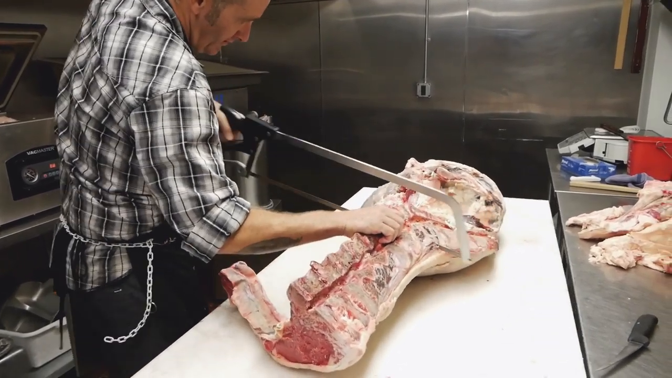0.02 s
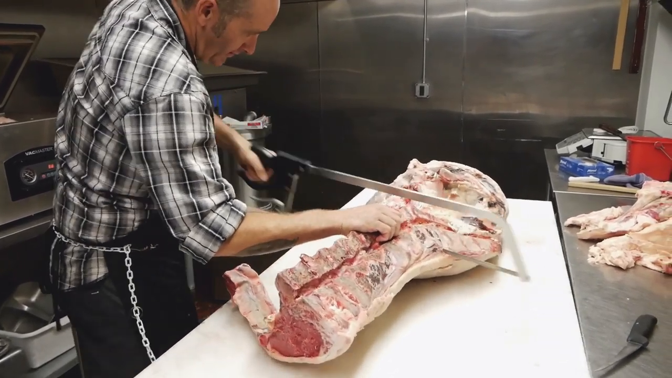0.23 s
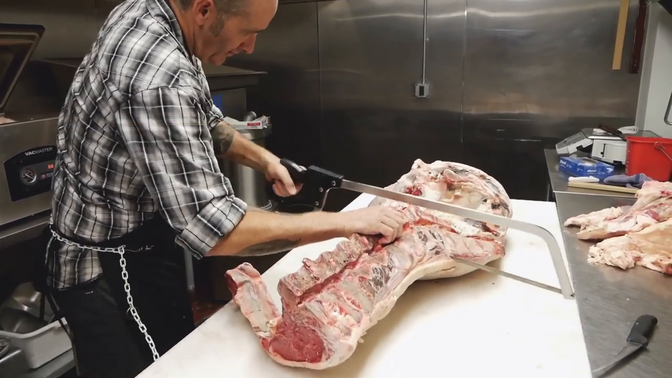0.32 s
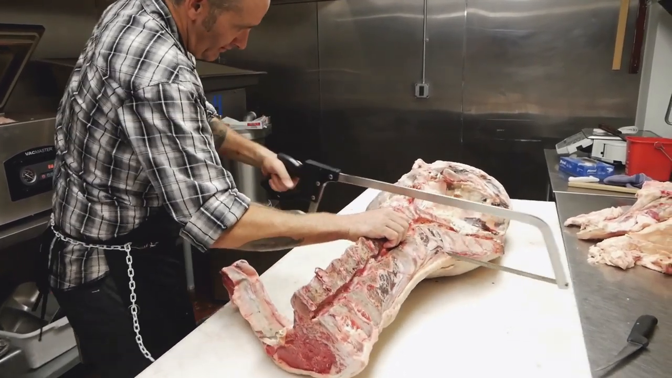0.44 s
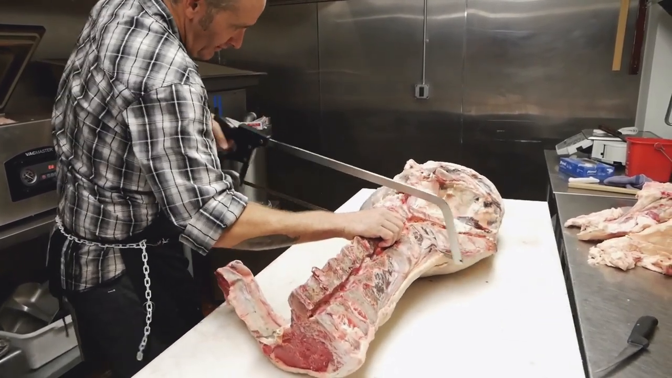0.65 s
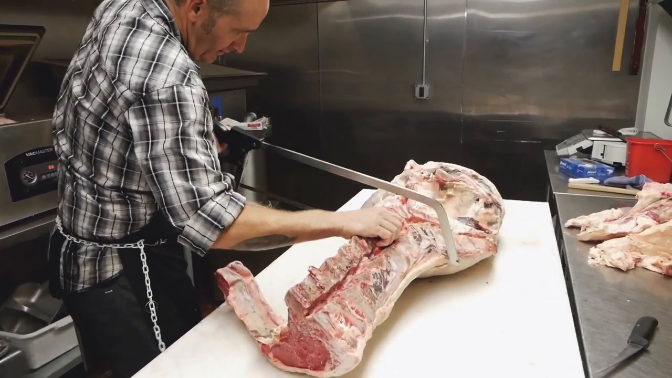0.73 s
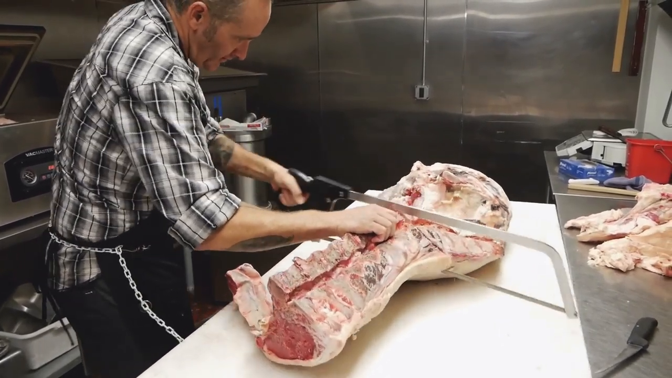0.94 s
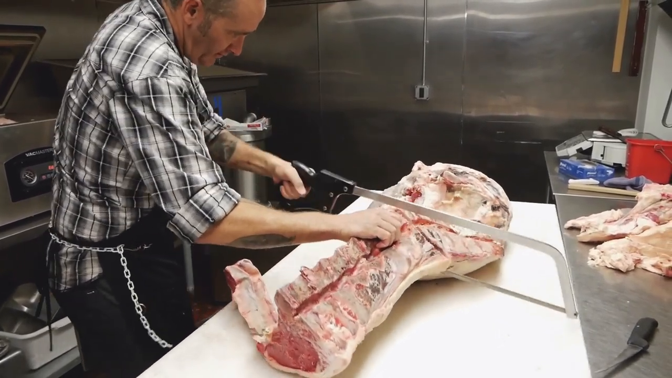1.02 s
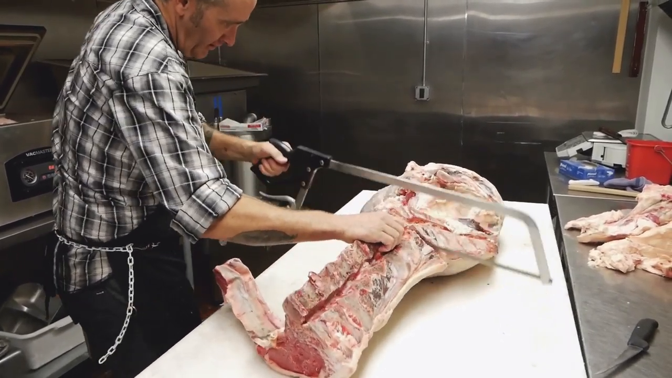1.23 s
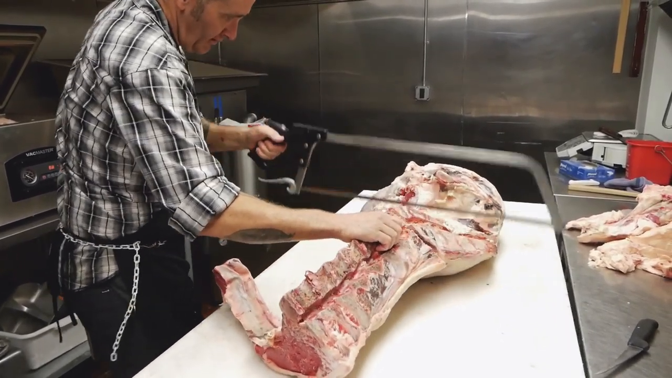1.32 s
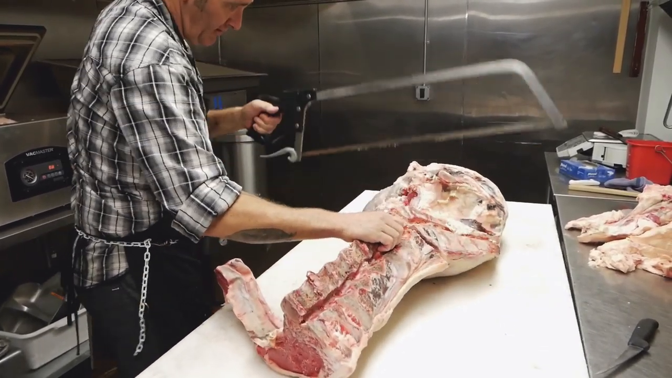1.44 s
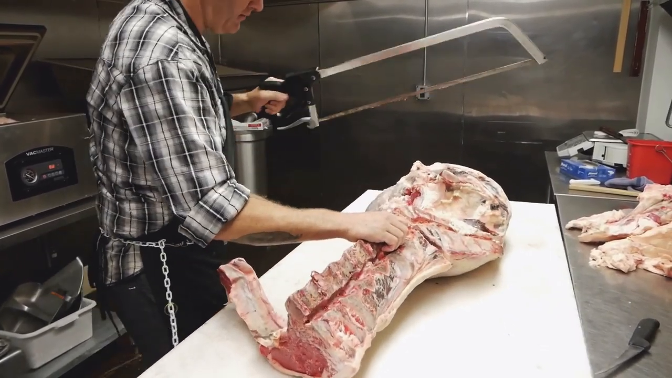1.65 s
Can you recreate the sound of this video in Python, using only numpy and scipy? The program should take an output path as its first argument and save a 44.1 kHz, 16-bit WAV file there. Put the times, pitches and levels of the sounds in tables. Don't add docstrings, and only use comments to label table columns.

```python
import sys
import numpy as np
from scipy import signal
from scipy.fft import rfft, irfft, next_fast_len
from scipy.io import wavfile
from scipy.ndimage import uniform_filter1d, map_coordinates

SR = 44100
rng = np.random.default_rng(int(sys.argv[2]) if len(sys.argv) > 2 else 0)


def pcm_store(signal):
    levels = np.round(np.clip(np.atleast_2d(signal), -1, 1) * 32767)
    wavfile.write(sys.argv[1], SR, levels.astype(np.int16).T)


def ratio_of_db(decibels):
    return 10 ** (np.asarray(decibels, float) / 20)


N = 74970

# f/Hz, level/dB per Hz
BLADE_COLOUR = [(900, -24.5), (2300, -12), (3280, -15.5), (3520, -7.5), (5000, -5.5), (9000, -9.5),
                (13000, -13), (16000, -29)]


def unit(x):
    return x / np.sqrt(np.mean(x ** 2) + 1e-20)


def along(points, hz):
    f, v = np.transpose(points)
    return np.interp(np.log(hz + 1), np.log(f + 1), v)


def curves(rows):
    s, *cols = np.transpose(rows)
    t = np.arange(N) / SR
    gate = np.clip(np.minimum(t - s[0] + 0.0079, s[-1] - t) / 0.0042, 0, 1)
    return [np.interp(t, s, c) for c in cols] + [gate]


def wobble(rate):
    knots = rng.standard_normal(int(N * rate / SR) + 4)
    return map_coordinates(knots, [np.arange(N) * rate / SR])


def filtered(x, response):
    m = next_fast_len(N + SR // 2)
    return irfft(rfft(x, m) * response(np.fft.rfftfreq(m, 1 / SR)), m)[..., :N]


def modes(table):
    def response(f):
        return sum((-1) ** k * ratio_of_db(db) * 1j * f * width / (hz * hz - f * f + 1j * f * width)
                   for k, (hz, width, db) in enumerate(table))
    return response


def colour(points):
    return lambda f: ratio_of_db(along(points, f)) * (f > points[0][0] / 2)


def patchy(x, depth_db):
    z = signal.stft(x, nperseg=256)[2]
    field = uniform_filter1d(rng.standard_normal(z.shape), size=4, axis=0)
    field = uniform_filter1d(field, size=5, axis=1)
    return signal.istft(z * ratio_of_db(depth_db * unit(field)), nperseg=256)[1][:N]


def swing(hz, t):
    return np.sin(2 * np.pi * hz * t)


def decay(db, t, t60_s):
    return ratio_of_db(db - 60 * t / t60_s)


def drop_in(track, start_s, sound):
    track[round(start_s * SR):][:len(sound)] += sound


def cooler():
    # f/Hz, width/Hz, level/dB
    hum_lines = [(27.8, 9.8, -52), (98, 13, -53.5), (147.3, 16, -47.5), (208.9, 5.6, -45.5),
                 (249.3, 18, -46.5), (292.6, 7.8, -54.5), (411.3, 5.7, -51.5), (465, 14, -66),
                 (675, 60, -59.5)]
    # f/Hz, level/dB per Hz
    air_colour = [(20, -7.5), (232, -3.5), (330, -9.5), (405, -8), (560, -18), (2600, -27), (3600, -35.5),
                  (15600, -44)]
    hum = sum(ratio_of_db(line[2]) * unit(filtered(rng.standard_normal(N), modes([line]))) for line in hum_lines)
    air = unit(filtered(rng.standard_normal(N), colour(air_colour)))
    return ratio_of_db(-46.5) * air + hum


def room(x):
    # f/Hz, t60/s
    tile_decay = [(200, 0.53), (2000, 0.39), (6000, 0.47), (14000, 0.2)]
    out, step = np.zeros(N + SR), SR // 8
    for a in range(0, N, step):
        hz, t, z = signal.stft(rng.standard_normal(SR // 2), SR, nperseg=256)
        fall = ratio_of_db(-60 * t / along(tile_decay, hz)[:, None])
        tail = signal.istft(z * fall, SR, nperseg=256)[1]
        y = signal.fftconvolve(x[a:a + step], tail / np.linalg.norm(tail))
        out[a + 200:][:len(y)] += y
    return out[:N]


def shoe():
    # f/Hz, level/dB per Hz
    sole_colour = [(600, -6), (920, -1), (1300, -16), (1650, -19), (4500, -18.5), (7000, -20),
                   (11000, -31.5), (12500, -44)]
    # t/s, length/s, f/Hz, level/dB
    squeaks = [
        (1.61, 0.025, 4240, -51),
        (1.647, .02, 4200, -74),
    ]
    t = np.arange(N) / SR
    u = t - 1.5175
    shape = np.clip(u / 0.003, 0, 1) * decay(0, np.maximum(u - 0.049, 0), t60_s=0.35)
    rub = unit(filtered(rng.standard_normal(N) * ratio_of_db(0.9 * wobble(230)), colour(sole_colour)))
    hiss = filtered(rub, lambda f: np.clip(f / 1500 - 1, 0, 1))
    hiss_gain = decay(2, np.maximum(u - 0.033, 0), t60_s=0.5)
    scuff = ratio_of_db(-42) * shape * (rub + hiss * (hiss_gain - 1))
    for start_s, length_s, hz, db in squeaks:
        swell = np.sin(np.pi * np.clip((t - start_s) / length_s, 0, 1))
        scuff = scuff + ratio_of_db(db) * swell * swing(hz, t)
    return scuff


def handle_knock():
    # f/Hz, level/dB, t60/s
    wood_modes = [(1100, -4, 0.03), (1800, 4.5, 0.018), (2400, 6.5, 0.0076), (3300, 4, 0.0066)]
    out, t = np.zeros(N + SR), np.arange(SR // 8) / SR
    ring = sum(decay(db, t, t60_s) * (1 - np.exp(-t * hz / 0.7)) * swing(hz, t)
               for hz, db, t60_s in wood_modes)
    rest_hz, sag_hz, sag_s = 876, 993, 0.0028
    turns = rest_hz * t + sag_hz * sag_s * (1 - np.exp(-t / sag_s))
    ring += decay(3, np.maximum(t - 0.0041, 0), t60_s=0.031) * np.sin(2 * np.pi * turns)
    drop_in(out, 1.0241, ratio_of_db(-26) * ring)
    return out[:N]


def tooth_ticks():
    # t/s, peak/dB, ring f/Hz, ring t60/s,
    # crack/dB over the peak, crack t60/s
    catches = [(0.19, -23.5, 4680, 0.0046, 4.5, 0.0076), (.4389, -4, 2400, 0.0041, 0, 0.0049),
               (.4435, -14.5, 3300, 0.0032, -2, 0.0026), (.6374, -23.5, 3540, 0.018, -3.5, .01),
               (.641, -28, 3990, 0.0066, 0, .008), (.7135, -33.5, 12100, 0.022, 0, .02),
               (.7155, -35.5, 10030, 0.028, -9, .02), (.8472, -14.5, 4000, 0.018, 0, .01),
               (0.7136, -31, 6100, .025, 4.5, .03), (0.7728, -31, 3770, 0.018, 3, 0.0086),
               (.798, -26, 4960, 0.032, 1.5, 0.012), (.843, -19, 3800, 0.009, 1, 0.023),
               (.8679, -8, 3690, 0.017, -9, .005), (1.0238, -17.5, 4698, 0.004, -2, .004),
               (1.24, -44, 5180, 0.021, -3, .09)]
    # f/Hz, width/Hz, level/dB
    crack_modes = [(5540, 8000, 1)]
    rings, cracks, t = np.zeros(N + SR), np.zeros(N + SR), np.arange(SR // 8) / SR
    for start_s, db, hz, t60_s, crack_db, crack_t60_s in catches:
        rise = 1 - np.exp(-t * hz / 0.66)
        drop_in(rings, start_s, 0.85 * decay(db, t, t60_s) * rise * swing(hz, t))
        crack_rise = 1 - np.exp(-t / crack_t60_s * 12)
        grit = np.sign(rng.standard_normal(len(t)))
        drop_in(cracks, start_s, decay(db + crack_db, t, crack_t60_s) * crack_rise * grit)
    return rings[:N] + filtered(cracks[:N], lambda f: modes(crack_modes)(f) ** 2)


def jolt_rings():
    # t/s, peak/dB, f/Hz, t60/s
    jolts = [(.228, -19, 551, 0.053), (.258, -4.5, 3640, 0.05), (0.263, -26.5, 69, .16),
             (0.277, -4, 3824, 0.045), (.227, -13.5, 3730, 0.047), (.289, -10, 4100, .04),
             (.307, -12, 4160, .04), (.309, -9.5, 3548, .04), (.333, -10, 3700, 0.038),
             (.717, -31.5, 205.8, .3), (.797, -29, 2300, 0.028), (.864, -12, 3630, 0.02),
             (.880, -10, 3814, .02), (1.519, -38, 937, 0.066), (1.545, -38, 864, .06),
             (1.0265, -16, 860, 0.024), (1.036, -25, 1800, .02), (.236, -19.5, 617, 0.068),
             (.315, -13, 1190, 0.023), (.868, -17, 2172, 0.065), (.884, -18, 1467, 0.041),
             (.892, -14, 6440, .015), (0.875, -29.5, 66.9, 0.2), (.886, -12, 1860, 0.04)]
    out, t = np.zeros(N + SR), np.arange(SR // 8) / SR
    for start_s, db, hz, t60_s in jolts:
        rise = 1 - np.exp(-t / 0.003)
        drop_in(out, start_s, decay(db, t, t60_s) * rise * swing(hz, t))
    return out[:N]


def pull(rows, spectrum):
    drag_db, treble_db, gate = curves(rows)
    grains = rng.standard_normal(N) * ratio_of_db(1.5 * wobble(900) + 1.3 * wobble(120))
    drag = unit(filtered(patchy(grains, depth_db=1.7), colour(spectrum)))
    top = filtered(drag, lambda f: np.clip(f / 4000 - 1.5, 0, 1))
    return gate * ratio_of_db(drag_db) * (drag + top * (ratio_of_db(treble_db) - 1))


def tooth_strikes(rate_hz, turns):
    at = np.flatnonzero(np.diff(np.floor(turns)))
    chance = rng.standard_normal((N // 20, 2))[:len(at)]
    jitter = 0.07 * chance[:, 0] * SR / rate_hz[at]
    at = np.clip(at + jitter, 0, N - 1).astype(int)
    return np.bincount(at, ratio_of_db(3.5 * chance[:, 1]), N)


def push(rows, dull_db_per_db, tone):
    # f/Hz, width/Hz, level/dB
    blade_modes = [(3490, 110, -2), (3815, 200, -3), (5230, 260, -14), (5830, 100, -33.5),
                   (6900, 490, -18.5), (7560, 150, -27)]
    marrow_modes = [(430, 147, -1), (596, 258, -1), (897, 280, -2), (1316, 250, -6)]
    shell_modes = [(1380, 300, -3), (1860, 347, 1), (2178, 320, 1), (2820, 600, -2.5)]
    carcass_modes = [(106, 68, -7.5), (210, 104, 0.5), (328, 510, -6)]
    rate_hz, rasp_db, marrow_db, shell_db, shove_db, ring_hz, gate = curves(rows)
    pressure_db = rasp_db - rasp_db.max()
    turns = np.cumsum(rate_hz * (1 + .02 * wobble(60))) / SR
    teeth = tooth_strikes(rate_hz, turns)

    burst = unit(np.convolve(teeth, np.exp(-np.arange(100) / (0.000094 * SR)))[:N])
    gated = 0.17
    grit = rng.standard_normal(N) * (1 - gated + gated * burst) * ratio_of_db(0.29 * wobble(150))
    steel = lambda f: colour(BLADE_COLOUR)(f) * (1 + modes(blade_modes)(f))
    rasp = unit(filtered(patchy(grit, depth_db=2), steel))
    top = filtered(rasp, lambda f: np.clip(f / 6000 - .9, 0, 1))
    rasp = rasp - top * (1 - ratio_of_db(dull_db_per_db * pressure_db))

    ring = unit(wobble(270) * np.sin(2 * np.pi * np.cumsum(ring_hz) / SR))
    ring *= ratio_of_db(-11.5 + 1.4 * pressure_db)

    drive = unit(teeth - teeth.mean()) + 0.57 * rng.standard_normal(N)
    marrow = unit(filtered(drive, lambda f: modes(marrow_modes)(f) ** 2 * (f > 350)))
    marrow = unit(marrow + tone * ratio_of_db(1.4 * wobble(70)) * np.sin(2 * np.pi * turns))
    shell = unit(filtered(patchy(drive, depth_db=2.5), lambda f: modes(shell_modes)(f) ** 2))
    meat = unit(filtered(rng.standard_normal(N), modes(carcass_modes)))
    body = ratio_of_db(marrow_db) * marrow + ratio_of_db(shell_db) * shell + ratio_of_db(shove_db) * meat
    return gate * ratio_of_db(rasp_db) * (rasp + ring + body)


def scene():
    # t/s, tooth rate f/Hz, rasp/dB, then over the rasp marrow/dB, shell/dB, shove/dB; blade ring f/Hz
    first_push = [
        (.168, 430, -54, -36, -18, -29.5, 3600),
        (.223, 530.5, -24, -41, -23, -37, 3600),
        (.230, 559, -22, -16.5, -26, -40, 3620),
        (.258, 652.6, -14.5, -15, -33.5, -29.5, 3620),
        (.282, 655.8, -15, -10.5, -21.5, -12, 3850),
        (.312, 657.4, -16, -13, -24.5, -12, 4070),
        (.334, 507, -19.5, -9, -12.5, -11, 4110),
        (.358, 414.8, -22, -12.5, -21, -18.5, 4050),
        (.43, 414, -40.5, -2, -8, -28.5, 3900),
    ]
    second_push = [
        (.785, 653.4, -45.5, -35, -38, -32, 3530),
        (.812, 696, -33, -22, -14.5, -38, 3646),
        (.845, 711, -26, -21.5, -4, -46, 3550),
        (.870, 722.2, -20.5, -16.5, -11.5, -12, 3620),
        (.892, 742.2, -21, -7.5, -9.5, -12.5, 3860),
        (.915, 730, -22.5, -11.5, -13, -17, 4080),
        (.934, 703, -26, -4, -34, -5.5, 4150),
        (1.0, 625, -33, -16, -5.5, -12, 3700),
        (1.15, 390.3, -58, 6, 3, -2.5, 3570),
    ]
    # t/s, drag/dB, treble/dB
    pulls = [
        [(0, -45.5, 2), (.02, -44, -4), (.07, -52.5, -1), (.16, -77, 0)],
        [(.43, -34.5, 2.5), (.455, -34, 1.5), (.505, -42, -3), (.56, -36, 0.5), (.62, -43.5, -1),
         (.63, -34, -5.5), (.65, -35.5, -5), (.69, -42, -4.5), (.79, -54.5, 6)],
    ]
    # f/Hz, level/dB per Hz
    drag_colour = [(900, -27), (2050, -10.5), (2300, 0), (2650, -7.5), (3600, -1.5), (5000, -2), (8000, -5),
                   (12500, -7.5), (16000, -22)]
    # f/Hz, level/dB
    side_tilt = [(60, -2.5), (1000, 0.5), (2500, -5.5), (5000, 6.5), (12000, 12)]
    near = push(first_push, dull_db_per_db=0.14, tone=0.41)
    near = near + push(second_push, dull_db_per_db=0.27, tone=0.11)
    near = near + pull(pulls[0], BLADE_COLOUR) + pull(pulls[1], drag_colour)
    near = near + tooth_ticks() + jolt_rings() + handle_knock() + shoe()
    mid = near + ratio_of_db(-7) * room(near) + cooler()
    hz, _, z = signal.stft(mid, SR, nperseg=256)
    scatter = np.exp(2j * np.pi * rng.random(z.shape))
    z = z * scatter * ratio_of_db(-16 + along(side_tilt, hz))[:, None]
    side = signal.istft(z, nperseg=256)[1][:N]
    return np.array([mid + side, mid - side])


def narrowed(mid, side):
    # start t/s, end t/s
    mono_spells = [
        (.225, .3),
        (.805, .835),
    ]
    zm, zs = signal.stft(np.array([mid, side]), nperseg=2048)[2]
    loud_db = 10 * np.log10(np.mean(np.abs(zm[150:600]) ** 2, axis=0) + 1e-20)
    luck = np.repeat(rng.standard_normal((33, zs.shape[1])), 32, axis=0)[:len(zs)]
    low = (np.arange(len(zs)) < 192)[:, None]
    low_margin_db = 29 * luck - 55.5 / 2
    high_margin_db = -60.5 + 19.5 * luck - loud_db
    keep = np.clip(np.where(low, low_margin_db, high_margin_db) / 2, 0, 1)
    block_s = np.arange(zs.shape[1]) * 1024 / SR
    for a, b in mono_spells:
        keep = keep * np.clip(np.maximum(a - block_s, block_s - b) / .004, 0, 1)
    return signal.istft(zs * keep, nperseg=2048)[1][:N]


def band_limit(x):
    return signal.sosfilt(signal.butter(12, 15740, fs=SR, output="sos"), x)


def record(dry):
    ceiling, knee = .95, 4
    x = dry / (1 + np.abs(dry / ceiling) ** knee) ** (1 / knee)
    x = filtered(x, lambda hz: hz < 15750)
    mid, side = (x[0] + x[1]) / 2, (x[0] - x[1]) / 2
    side = narrowed(mid, side)
    return band_limit(np.array([mid + side, mid - side]))


dry = scene()
out = record(dry)
pcm_store(out)
```